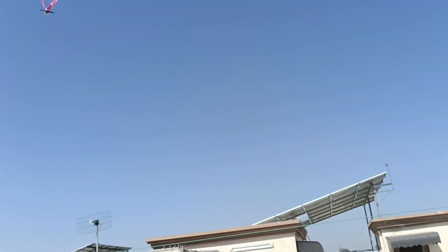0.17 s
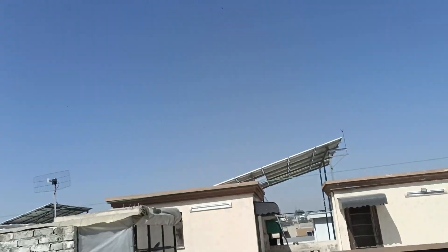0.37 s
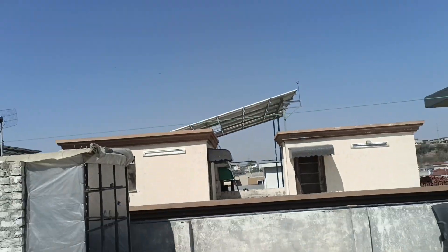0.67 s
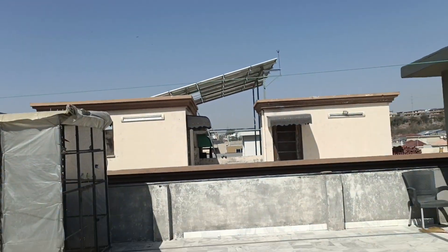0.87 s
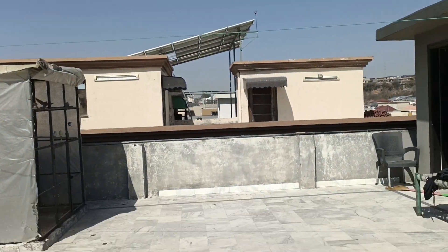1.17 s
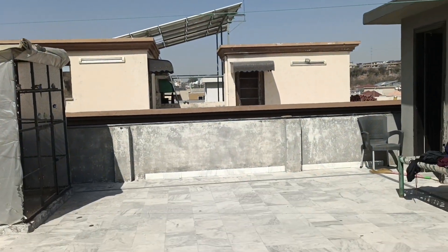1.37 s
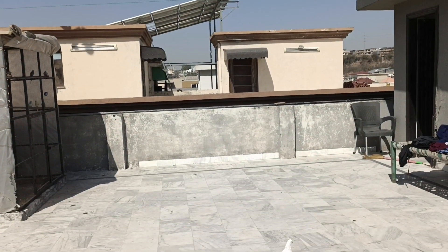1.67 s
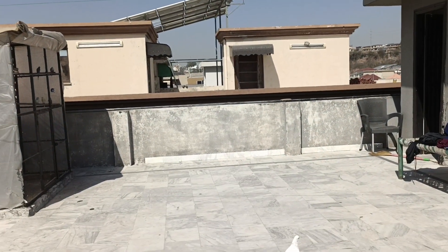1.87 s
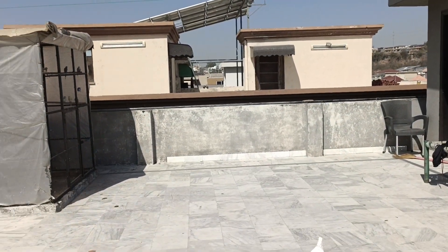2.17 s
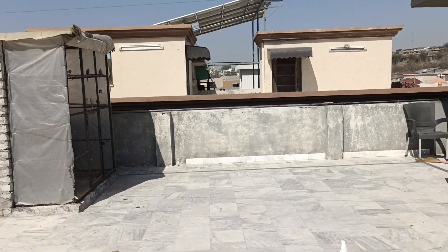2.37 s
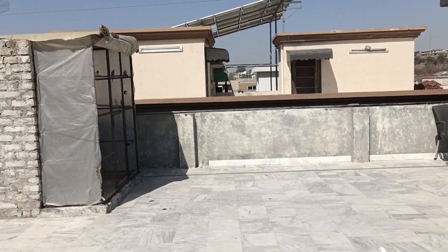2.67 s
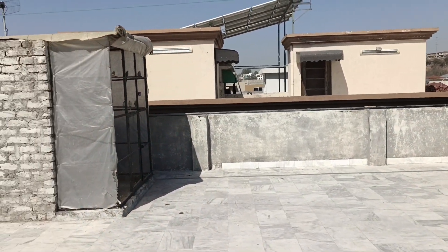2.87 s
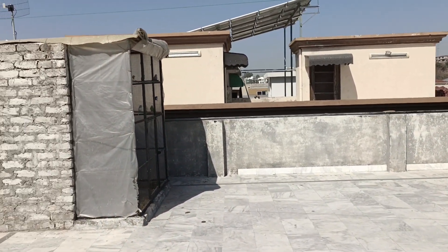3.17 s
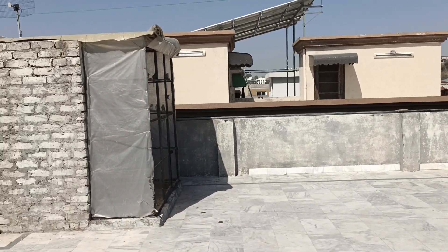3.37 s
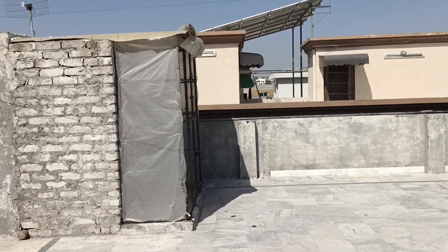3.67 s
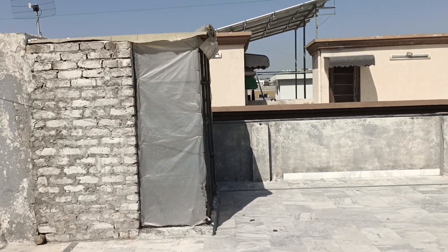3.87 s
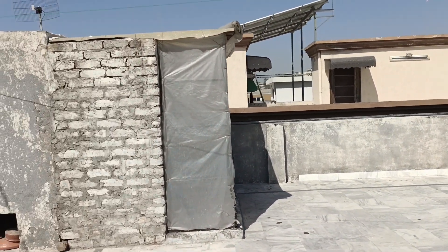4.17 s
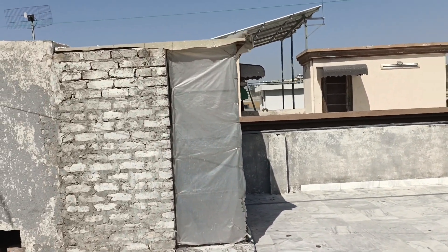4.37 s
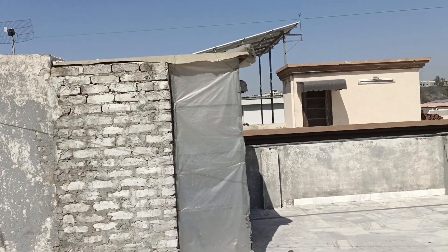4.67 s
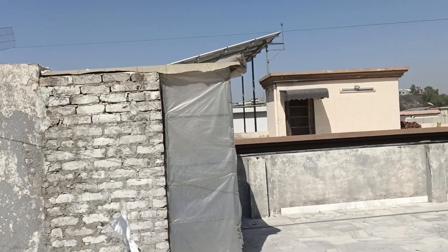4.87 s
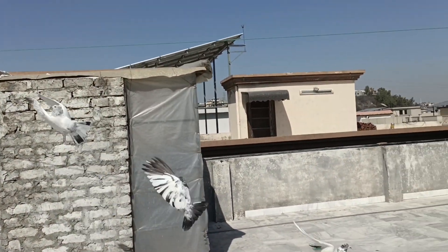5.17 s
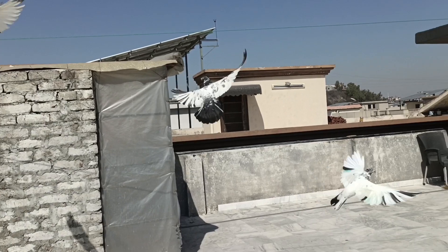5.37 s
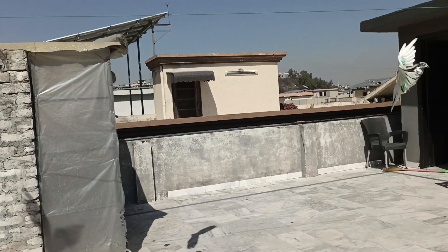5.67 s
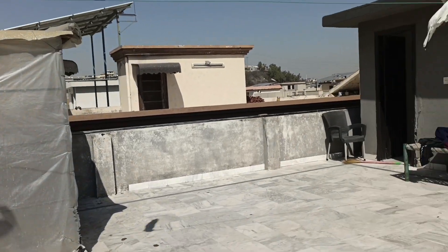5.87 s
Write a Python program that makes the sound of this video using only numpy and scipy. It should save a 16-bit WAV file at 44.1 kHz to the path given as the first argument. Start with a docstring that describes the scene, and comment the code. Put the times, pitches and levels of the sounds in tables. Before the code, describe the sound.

Crows caw repeatedly to the left as sharp pigeon wing claps and short myna chirps echo lightly off the walls of a rooftop. A soft knock leads into scratchy rustles, and a light wind rumbles on the microphone. Toward the end, pigeons fly up and pass close by, their wings slapping and swishing, with the town humming faintly behind.

```python
"""Sharp wing claps ring out as pigeons take off from a walled roof terrace: lone beats first, at the end
a close flurry of whooshing feathers. Each clap is an impact that rings the quills and the air between
the wings. Crows caw on the left, harmonics shaped by a narrow throat, and mynas chatter in whistled
glides; the walls echo them. Soft knocks and rough rustles of friction come in between, and a light
breeze buffets the microphones over the faint hum of the town."""
import sys
import numpy as np
from scipy import signal
from scipy.fft import rfft, irfft, next_fast_len
from scipy.io import wavfile
from scipy.ndimage import uniform_filter1d, map_coordinates

SR = 44100
rng = np.random.default_rng(int(sys.argv[2]) if len(sys.argv) > 2 else 0)


def wav_record(signal):
    """Record a signal, one row per channel, as 16-bit PCM in the file named by sys.argv[1]."""
    frames = np.transpose(np.atleast_2d(signal))
    bounded = np.clip(frames, -1, 1)
    # unit amplitude maps onto the largest positive 16-bit level
    quanta = np.round(bounded * 32767).astype(np.int16)
    wavfile.write(sys.argv[1], SR, quanta)


N = 264952
TIME = np.arange(N) / SR

# Table levels are relative. Pan is left level minus right level.
# Spectrum of air rushing through feathers: f/Hz, level/dB
SWISH_SPECTRUM = [(350, -13.5), (500, -26.5), (680, -6), (830, -11.5), (1150, -8), (1600, -2), (2300, -10),
                  (4000, -10.5), (5200, -25)]
# Spectrum of the fine hiss of sliding vanes or fibres: f/Hz, level/dB
HISS_SPECTRUM = [(2000, -3), (4000, 5), (5200, 0), (6500, 5), (7700, 9), (9200, 5), (12000, 2),
                 (15500, -1.5)]


def from_db(db):
    """Amplitude ratio of a level."""
    return 10 ** (np.asarray(db) / 20)


def rms_one(x):
    """Normalisation to unit rms."""
    return x / np.sqrt(np.mean(x ** 2) + 1e-20)


def envelope(points):
    """Gain interpolated through (t/s, level/dB) points, fading quickly outside their span."""
    s, db = np.transpose(points)
    inside = uniform_filter1d(((TIME >= s[0]) & (TIME <= s[-1] + .01)) * 1., size=400)
    return from_db(np.interp(TIME, s, db)) * inside


def swell_hold_release(s, swell_s, hold_s, release_s):
    """Envelope with a quadratic rise, a plateau and an exponential decay."""
    t = TIME - s
    return np.clip(t / swell_s, 0, 1) ** 2 * np.exp(-np.clip((t - swell_s - hold_s) / release_s, 0, 20))


def bump(s, half_s):
    """Gaussian envelope peaking at time s."""
    return np.exp(-np.minimum(((TIME - s) / half_s) ** 2, 20))


def at_hz(points, hz):
    """Gain interpolated through (f/Hz, level/dB) points, falling steeply beyond their ends."""
    f, db = np.transpose(points)
    log_f = np.log([f[0] / 2, *f, f[-1] * 2])
    return from_db(np.interp(np.log(hz + 1), log_f, [db[0] - 19.5, *db, db[-1] - 30]))


def colour(x, points):
    """Minimum-phase filter of unit power gain: causal, so nothing sounds early."""
    size = next_fast_len(x.shape[-1] + 4096)
    size += size % 2
    gain = rms_one(at_hz(points, np.arange(size // 2 + 1) * SR / size))
    cepstrum = irfft(np.log(gain))
    cepstrum[1:size // 2] *= 2
    cepstrum[size // 2 + 1:] = 0
    return irfft(rfft(x, size) * np.exp(rfft(cepstrum)), size)[..., :x.shape[-1]]


def passband(x, band, hz, order):
    """Maximally flat low-pass or high-pass filter."""
    return signal.sosfilt(signal.butter(order, hz, btype=band, fs=SR, output="sos"), x)


def resonator(x, hz, q):
    """Resonance with steep skirts, from two equal stages in cascade; unit rms."""
    b, a = signal.iirpeak(hz, max(q, 1), fs=SR)
    return rms_one(signal.lfilter(b, a, signal.lfilter(b, a, x + 1e-18)))


def drift(rate_hz, size=N):
    """Interpolated random fluctuation with a standard deviation near 1."""
    knots = rng.standard_normal(size // 8 + 4)
    return 1.2 * map_coordinates(knots, [np.arange(size) * min(rate_hz / SR, 1 / 8)], order=1)


def pan(db):
    """Constant-power panning; positive is to the left."""
    return rms_one(from_db(np.array([[db], [-db]]) / 2))


def noise_pair(correlation, size=N):
    """Partly correlated white noise at two microphones."""
    common = np.sqrt(correlation) * rng.standard_normal(size)
    return common + np.sqrt(1 - correlation) * rng.standard_normal((2, size))


def grainy(rate_hz, grain_db, correlation):
    """Friction noise: random modulation breaks it into tiny snaps, as of sliding vanes or fibres."""
    return rms_one(noise_pair(correlation) * from_db(grain_db * np.clip(drift(rate_hz), -2.5, 2.5)))


def patchy(x, depth_db, rate_hz):
    """Quarter-octave bands fluctuate independently, as hollows between moving surfaces change shape."""
    size = next_fast_len(N)
    spectrum, octave = rfft(x, size), np.log2(np.arange(size // 2 + 1) * SR / size + 1)
    out = 0
    for centre in np.arange(6, 12.6, .25):
        band = irfft(spectrum * np.clip(1 - 4 * np.abs(octave - centre), 0, 1), size)[:, :N]
        out = out + band * from_db(depth_db * np.clip(drift(rate_hz), -2, 2))
    return rms_one(out)


def add(out, s, sound):
    """Superpose a sound from time s onwards."""
    i = max(0, int(s * SR))
    out[:, i:i + sound.shape[-1]] += sound[:, :max(0, N - i)]


def terrace(x, wall_db, bass_t60_s=.45, treble_t60_s=.34, crossover_hz=3590):
    """Reverberation: smeared early reflections and a diffuse tail whose treble decays first."""
    # Wall reflections: delay/s, level/dB
    walls = [(0.0105, -2.5), (0.02, -3.5), (0.044, -6)]
    t, response = TIME[:SR * 3 // 4], 0
    for band, t60 in (("low", bass_t60_s), ("high", treble_t60_s)):
        shape = from_db(-4 - 60 * t / t60) * (t > .006)
        for delay, db in walls:
            shape = shape + from_db(db + wall_db) * np.exp(-np.abs(t - delay) / .00029)
        response = response + passband(noise_pair(.081, len(t)) * shape, band, crossover_hz, order=6)
    response = passband(response, "low", 6500, order=1)
    return signal.fftconvolve(x, rms_one(response) / np.sqrt(len(t)), axes=1)[:, :N]


def town_hum(floor_db=-72.5):
    """Steady ambient hum of the town; the recorder's automatic gain lifts it briefly in two lulls."""
    # Spectrum of the hum: f/Hz, level/dB
    spectrum = [(25, -16), (70, -1), (150, -0.5), (400, -6), (800, -10.5), (1500, -5.5), (2500, -15.5),
                (4200, -18.5), (5500, -35), (15000, -36.5)]
    # Lifts as the gain recovers, at set times: peak t/s, half-width/s, level/dB
    gain_lifts = [(1.486, 0.095, -72), (2.031, 0.12, -74)]
    strength = from_db(floor_db) + sum(from_db(db) * bump(s, half_s) for s, half_s, db in gain_lifts)
    return strength * colour(noise_pair(.73), spectrum)


def breeze(gain_db=3.5, lumpy_db=3):
    """Turbulence at the microphones: lumpy, low-frequency pressure fluctuations."""
    # The breeze gets up and stays: t/s, level/dB
    rise = [(2.2, -107), (2.4, -78), (3.3, -75.5), (4.6, -59.5), (6.0, -70.5)]
    # Gusts on top of it: peak t/s, half-width/s, level/dB
    gusts = [(2.424, 0.028, -71), (2.72, 0.034, -59.5), (3.019, 0.12, -74), (3.355, 0.061, -50.5),
             (3.447, 0.014, -41), (3.545, 0.08, -57), (3.9, 0.037, -57), (4.165, 0.062, -60),
             (4.411, 0.025, -51), (4.7, 0.055, -83), (5.076, 0.084, -63)]
    # Spectrum of the buffeting: f/Hz, level/dB
    spectrum = [(25, -43), (45, 6.5), (75, 12), (120, 5), (180, -8.5), (300, -21), (600, -96)]
    wind = envelope(rise) + sum(from_db(db) * bump(s, half_s) for s, half_s, db in gusts)
    buffet = rms_one(colour(noise_pair(.53), spectrum) * from_db(lumpy_db * drift(27)))
    return from_db(gain_db) * wind * buffet * pan(-15)


def rustles(release_s=.021, glide_width_hz=420):
    """Sliding friction drives resonances: a hollow note, a lumpy scuff, a gliding rasp and a hiss."""
    # Strokes: t/s, swell/s, hold/s, hollow f/Hz, hollow level/dB, scuff level/dB, rasp level/dB,
    # hiss level/dB, resonance f/Hz, its glide/(Hz/s), its level/dB
    strokes = [(2.118, 0.083, 0.026, 488, -97, -78, -60, -75, 4134, -5, -65),
               (3.332, 0.0084, 0.035, 408, -62, -44, -44.5, -67, 2170, 5000, -52),
               (3.351, 0.06, 0.055, 434, -51, -44, -41, -62, 3335, 4509, -42),
               (3.452, 0.041, 0.057, 567, -41.5, -38.5, -37.5, -53.5, 3214, 800, -45.5),
               (3.592, 0.021, 0.069, 659, -57, -47, -50, -67, 3970, 2, -61),
               (3.676, 0.064, 0.066, 590, -79, -82, -50.5, -71, 4350, -2000, -56.5),
               (3.991, 0.083, 0.098, 588, -93, -79, -39.5, -47.5, 3910, 3400, -44),
               (4.132, 0.061, 0.08, 456, -54.5, -45.5, -37.5, -45.5, 4730, -4000, -44),
               (4.291, 0.012, 0.023, 656, -70, -67, -39.5, -74, 2400, 0, -43)]
    # Spectrum of the scuff: f/Hz, level/dB
    scuff_spectrum = [(580, -11.5), (730, 5.5), (900, 13), (1020, 12), (1130, -11), (1280, -4), (1520, -12),
                      (1800, -2), (2300, -9), (2700, -9.5)]
    # Resonances of the rubbed surface: f/Hz, level/dB
    modes = [(930, -10), (1030, -3.5), (1260, -4.5), (1530, 4.5)]
    # Spectrum of the rasp: f/Hz, level/dB
    rasp_spectrum = [(1500, -7), (2000, -12), (2600, -7), (3300, -0.5), (3950, -3), (4600, -23),
                     (5400, -37.5)]
    lumps, friction = grainy(200, 2, .85), grainy(900, 1.5, .3)
    ringing = sum(from_db(db + 2 * drift(14)) * resonator(lumps, hz, q=11) for hz, db in modes)
    lumpy = rms_one(.82 * colour(lumps, scuff_spectrum) + ringing)
    coarse = patchy(colour(friction, rasp_spectrum), depth_db=4, rate_hz=12)
    fine = colour(friction, HISS_SPECTRUM)
    # complex narrowband noise, shifted up to the gliding resonance in each stroke
    narrow = passband(noise_pair(.57) + 1j * noise_pair(.19), "low", glide_width_hz / 2, order=4)
    narrow = rms_one(narrow.view(float)).view(complex)
    low, high = 0, 0
    for s, swell_s, hold_s, hollow_hz, *levels, ring_hz, glide_hz_per_s, ring_db in strokes:
        stroke, t = swell_hold_release(s, swell_s, hold_s, release_s), TIME - s
        hollow, scuff, rasp, hiss = np.outer(from_db(levels), stroke)
        glide = np.real(narrow * np.exp(2j * np.pi * (ring_hz + glide_hz_per_s * t / 2) * t))
        low = low + hollow * resonator(lumps, hollow_hz, q=3) + scuff * lumpy
        high = high + rasp * coarse + hiss * fine + from_db(ring_db) * stroke * glide
    return low * pan(2.94) + high * pan(8.5)


def knocks(attack_s=.0047):
    """Modal vibration of a struck hollow body; a long contact excites only the lowest modes."""
    # Soft blows: t/s, level/dB, contact time/s
    blows = [(3.332, -21, 0.00012), (3.502, -47, .0011)]
    # Modes of the body: f/Hz, level/dB, T60/s
    modes = [(144, -31, 0.29), (351.4, -10.5, 0.053), (372.4, 1.5, 0.046), (741, -14.5, 0.082),
             (1014, -22.5, 0.56), (1226, -4, 0.048), (1356, 15, 0.018), (2260, -1.5, 0.026),
             (2907, 4, 0.014)]
    out, t = np.zeros((2, N)), TIME[:SR // 5]
    for s, db, contact_s in blows:
        ring = 0
        for hz, mode_db, t60 in modes:
            amplitude = from_db(mode_db - 60 * t / t60) / (1 + (hz * contact_s) ** 4)
            ring = ring + amplitude * np.sin(2 * np.pi * (hz * t + rng.random()))
        add(out, s, from_db(db) * ring * (1 - np.exp(-t / attack_s)) * pan(4.8))
    return out


def caw_contours(scoop=.14, droop=.085, grit=.18, crack=.22):
    """Phonation follows the breath: a caw scoops up in pitch, then droops and cracks as air runs out."""
    # Caws: t/s, swell/s, hold/s, level/dB, fundamental f/Hz, hoarseness (0-1), overtone level/dB
    caws = [(0.0, 0.00035, 0.039, -42.5, 475.4, 0.29, 0), (0.368, 0.021, 0.16, -41, 465, 0.55, 8),
            (0.62, 0.065, 0.054, -53, 520, 0, 5), (1.035, 0.034, 0.15, -33, 467.5, 0, -0.5),
            (1.42, 0.068, 0.028, -54, 527, 0.35, 7.5), (1.53, 0.054, 0.11, -43, 480, 0.29, 2),
            (1.735, 0.017, 0.01994, -55, 470, 0.37, -3), (2.08, 0.15, 0.064, -43, 464.7, 0.44, 11),
            (2.34, 0.071, 0.16, -44.5, 480.7, 0.34, -3), (2.54, 0.057, 0.19, -54.5, 493.3, 0.33, -11),
            (2.79, 0.084, 0.17, -43, 475.8, 0.66, 6.5), (3.71, 0.069, 0.27, -48, 476, 0.39, 2)]
    loudness, hoarse, far = np.zeros((3, N))
    pitch, bright = np.full(N, float(caws[0][4])), np.ones(N)
    for s, swell_s, hold_s, db, hz, hoarseness, overtones_db in caws:
        begun = TIME >= s
        t = np.minimum(TIME[begun] - s, .5)
        progress, release_s = t / (swell_s + hold_s), .024 + .034 * hoarseness
        loudness += from_db(db) * swell_hold_release(s, swell_s, hold_s, release_s)
        pitch[begun] = hz * (1 - scoop * np.exp(-2 * t / swell_s) - droop * np.minimum(progress, 1.15) ** 2)
        hoarse[begun] = grit + hoarseness + crack * np.minimum(progress, 1.1) ** 6
        far[begun], bright[begun] = hoarseness, from_db(overtones_db)  # hoarser crows are further off
    # each caw takes over smoothly from the one before
    pitch, hoarse, far, bright = uniform_filter1d(np.array([pitch, hoarse, far, bright]), size=600)
    return loudness, pitch, np.clip(hoarse, 0, 1), far, bright


def crows(trill_hz=75, trill=.039, jitter=.051, flicker_db=4.5, blur_rad=.9, gain_db=-2):
    """Source and filter: harmonics of a fast-shaking pitch pass the formants of a narrow throat."""
    # Response of the throat: f/Hz, level/dB
    throat = [(900, -45), (1200, -22), (1370, -3.5), (1560, 7), (1780, 3), (1980, 10.5), (2250, -31),
              (2700, -64), (3250, -39.5), (3600, -45.5), (4130, -19), (4400, -33.5), (4650, -37.5),
              (5150, -63.5), (5600, -35), (6100, -45.5), (6400, -53), (8000, -45.5), (10000, -56.5)]
    loudness, pitch, hoarse, far, bright = caw_contours()
    shake = np.sin(2 * np.pi * np.cumsum(trill_hz * (1 + .21 * hoarse * drift(40))) / SR)
    phase = 2 * np.pi * np.cumsum(pitch) / SR
    wobble = 2 * np.pi * np.cumsum(pitch * (trill * shake + jitter * hoarse * drift(500))) / SR
    voice = sum(at_hz(throat, k * pitch) * np.sin(k * (phase + wobble)) for k in range(2, 6))
    for k in range(6, 20):  # faint overtones waver independently and throb with the shake
        strength = at_hz(throat, k * pitch) * from_db(flicker_db * (drift(22.21) - .5))
        overtone = np.sin(k * phase + (1.5 + 3 * hoarse) * wobble + blur_rad * drift(260))
        voice += bright * (1 + .23 * shake) * strength * overtone
    voice /= np.sqrt(uniform_filter1d(voice ** 2, size=1800))  # even out the power
    rattle = from_db(4 * hoarse * drift(150))
    voice = passband(voice * rattle, "high", 1200, order=8) * from_db(gain_db) * loudness
    direct, wet = 1 - .46 * far, from_db(-19) + from_db(-1) * far
    return voice * direct * pan(16) + terrace(voice * wet * pan(13), wall_db=5.5)


def mynas(warble_hz=70, warble=.039, rasp=.09, buzz_hz=620, beak_hz=4900, overtone_db=-33, gain_db=3):
    """Modulated whistles: in harsh notes a second voice adds sidebands; pitch and strength break up."""
    # Notes: t/s, nominal length/s, start f/Hz, end f/Hz, level/dB, harshness (0-1)
    notes = [(0.481, 0.0075, 2990, 2970, -41.5, 0.04), (0.499, 0.022, 3430, 2800, -37, 0.21),
             (0.515, 0.0042, 4650, 4520, -52, 0.05), (0.516, 0.016, 4000, 3830, -37, 0.45),
             (0.541, 0.019, 2880, 3210, -33.5, 0.09), (0.565, 0.012, 3210, 2966, -35, 0.23),
             (0.573, 0.036, 4060, 3910, -40.5, 0.77), (2.274, 0.02, 4100, 3850, -50, 0.2),
             (2.312, 0.036, 3400, 1990, -47.5, 0.92), (2.356, 0.026, 3270, 2428, -50, 0.3),
             (2.395, 0.019, 2560, 2520, -42, 0.71), (2.527, 0.005, 4550, 4320, -43, 0),
             (2.543, 0.021, 4400, 3010, -42, 0), (2.585, 0.021, 3090, 1870, -47.5, 0.53),
             (2.624, 0.018, 3000, 2640, -44, 0.24), (2.645, 0.026, 3234, 2504, -37, 0.44),
             (2.669, 0.035, 4180, 3000, -36.5, 0.73), (2.704, 0.048, 3051, 2992, -35.5, 0.09),
             (2.743, 0.02, 3800, 3280, -37, 0.93), (3.275, 0.058, 3800, 3725, -59, 0.09),
             (3.399, 0.018, 3720, 3624, -42.5, 0.27), (3.757, 0.01, 3780, 3490, -44.5, 0.16),
             (3.803, 0.06, 2200, 3194, -53.5, 0.48), (3.844, 0.044, 3205, 2674, -45.5, 0.74),
             (3.899, 0.041, 3120, 2854, -47, 0.93), (4, 0.046, 2314, 3100, -50, 0.95),
             (4.143, 0.018, 3300, 3030, -39, 0.15), (4.163, 0.031, 2100, 1933, -44, 0.74),
             (4.169, 0.041, 4110, 3053, -37.5, 0.94), (4.206, 0.033, 3030, 2876, -36, 0),
             (4.242, 0.035, 3690, 3057, -37, 0.87), (4.336, 0.028, 3200, 2906, -40.5, 0.73),
             (4.403, 0.028, 3970, 3550, -40.5, 0.21), (4.456, 0.046, 3785, 3055, -42, 0.8),
             (5.043, 0.055, 4007, 2880, -45.5, 0.62), (5.108, 0.054, 3217, 2450, -45.5, 0.2),
             (5.177, 0.034, 3067, 3487, -35, 1), (5.218, 0.038, 3017, 2986, -33, 0.1),
             (5.257, 0.064, 3560, 3480, -46.5, 0.8), (5.291, 0.0096, 3020, 3050, -39.5, 0.7),
             (5.806, 0.016, 2562, 2704, -45, 0.28), (5.833, 0.028, 2566, 1975, -47.5, 1)]
    out = np.zeros((2, N))
    for s, length_s, start_hz, end_hz, db, harsh in notes:
        u = np.linspace(0, 1, int((length_s + .00625) * SR))
        jitter, flicker = drift(1500, 8000)[:len(u)], drift(301, 8000)[:len(u)]
        sway = warble * np.sqrt(abs(harsh)) * np.sin(2 * np.pi * (warble_hz * u * length_s + rng.random()))
        pitch = np.interp(u, [0, 1], [start_hz, end_hz]) * (1 + sway + rasp * harsh * jitter)
        phase = 2 * np.pi * np.cumsum(pitch) / SR
        second_voice = 1 + harsh * np.sin(2 * np.pi * np.cumsum(buzz_hz * (1 + .15 * flicker)) / SR)
        voice = passband(np.sin(phase) * second_voice, "low", beak_hz, order=8)
        voice += from_db(overtone_db) * (np.sin(2 * phase) + .35 * np.sin(3 * phase))
        shape = signal.windows.tukey(len(u), .4) * from_db((4.1 * harsh - 1) * flicker)
        add(out, s - .002, from_db(db + gain_db) * rms_one(voice * shape) * pan(7 * harsh))
    return out


def wingbeats(birds=3, beat_hz=9.7, depth=.48):
    """Incoherent addition: the stroke powers of birds beating out of step sum to one envelope."""
    cycles = [rng.random() + np.cumsum(beat_hz * (1 + .1745 * drift(1.9))) / SR for _ in range(birds)]
    strokes = rms_one(np.sqrt(sum(np.sin(np.pi * cycle) ** 10 for cycle in cycles)))
    return rms_one(1 - depth + depth * strokes)


def flock(swish_db=2.5, vane_db=-12, thrum_db=-3):
    """Aerodynamic noise: beating wings whoosh, ruffle their vanes and shake the air."""
    # Swish of the flock, louder when closer: t/s, level/dB
    nearness = [(4.3, -53), (4.6, -46.5), (4.72, -46.5), (4.775, -50.5), (4.87, -47.5), (5.03, -41.5),
                (5.075, -50), (5.13, -41.5), (5.29, -43.5), (5.47, -53.5), (5.57, -45), (5.61, -53.5),
                (5.71, -49.5), (6.0, -49.5)]
    # Low flutter of air as the birds pass close: t/s, level/dB
    flutter = [(4.9, -52.5), (5.188, -46.5), (5.472, -63.5), (5.5, -54.5), (5.65, -70), (5.726, -50.5),
               (6.0, -50)]
    # Spectrum of that flutter: f/Hz, level/dB
    flutter_spectrum = [(80, -14), (108, 6), (130, -4.5), (160, -3), (210, -11.5)]
    beating = envelope(nearness) * wingbeats()
    whoosh = from_db(swish_db) * patchy(colour(grainy(110, 2.5, .7), SWISH_SPECTRUM), 5, 26)
    vanes = from_db(vane_db) * colour(grainy(350, 2, .3), HISS_SPECTRUM)
    thrum = from_db(thrum_db) * envelope(flutter) * colour(noise_pair(1), flutter_spectrum)
    return beating * (whoosh * pan(6.1) + vanes * pan(2.7)) + thrum * pan(-.41)


def flaps(hollow_q=5.8, crinkle_db=-11):
    """Cavity resonance: a close stroke squeezes a hollow puff from under the wing; feathers crinkle."""
    # Close wing strokes: peak t/s, half-width/s, level/dB, hollow f/Hz
    strokes = [(4.088, 0.03, -51.5, 780), (4.345, 0.012, -52, 780), (4.408, 0.011, -49, 310),
               (4.463, 0.025, -47.5, 840), (4.498, 0.013, -36.5, 318), (4.58, 0.013, -49, 805),
               (4.614, 0.023, -53, 329), (4.685, 0.0074, -50, 1290), (4.708, 0.028, -51.5, 326),
               (4.715, 0.014, -41, 1300), (4.746, 0.015, -63, 1040), (4.811, 0.011, -49.5, 296),
               (4.913, 0.051, -51, 1030), (5.003, 0.0056, -48, 1122), (5.019, 0.044, -47, 321),
               (5.023, 0.0098, -49, 1013), (5.08, 0.063, -55, 774), (5.65, .012, -50, 1460),
               (5.784, 0.0079, -51, 845), (5.9, 0.0079, -45.5, 804)]
    puff, crinkle = grainy(250, 2.5, .9), colour(grainy(400, 4, .5), SWISH_SPECTRUM)
    out = 0
    for s, half_s, db, hollow_hz in strokes:
        stroke = from_db(db) * bump(s, half_s)
        hollow = np.sqrt(np.mean(stroke ** 2)) * resonator(puff * stroke, hollow_hz, hollow_q)
        out = out + hollow + from_db(crinkle_db) * stroke * crinkle
    return out


def quill_ticks(swell_s=.0024, decay_s=.00081):
    """Broadband transients: one stiff quill flicks past another with a tiny bright snap."""
    # Flicks: t/s, level/dB
    flicks = [(3.149, -48), (3.225, -52.5), (4.04, -37), (4.67, -46), (4.787, -28), (5.359, -51),
              (5.398, -43)]
    shape = sum(from_db(db) * swell_hold_release(s, swell_s, 0, decay_s) for s, db in flicks)
    return shape * colour(noise_pair(1), HISS_SPECTRUM) * pan(3)


def wing_claps(snap_delay_s=.001, soft_slap_s=.006, ring_width_hz=300, crackle_db=2.5, gain_db=.56):
    """Impact excitation: the wings meet in two quick slaps, ringing the quills and the hollow between."""
    # Claps: t/s, level/dB, slap decay/s, gap to second slap/s, its level/dB, nearness (0-1), pan/dB,
    # quill f/Hz, quill level/dB, hollow f/Hz, hollow level/dB
    claps = [(0.0103, -42.5, 0.004, 0.0092, 9.5, 0.3, 7, 2420, 3.5, 1790, -21),
             (0.2033, -41.5, 0.0057, 0.0069, 0, 0, 5, 1630, -2, 1176, -6),
             (0.39, -37, 0.0038, 0.0074, 4, 0.26, 3.5, 3200, -7, 1416, 1.5),
             (0.5652, -36.5, 0.0057, 0.0077, -4, 0.2, 3, 3180, 4, 1390, -5),
             (0.739, -39, 0.0031, 0.0077, 1, 0.17, 5, 3130, -2, 2500, -2),
             (0.8085, -37.5, 0.0023, 0.0063, -10, 0.32, 7, 3180, -2.5, 2370, -2),
             (0.9297, -39.5, 0.0031, 0.0054, -5, 0.24, 6, 4220, 3.5, 1610, 0),
             (1.0964, -53, 0.011, 0.0035, -12, 0, 7, 6070, -4, 1800, -8),
             (2.406, -52, 0.0069, 0.011, -21, 0.44, -4, 4080, 0, 1850, -10),
             (3.0787, -45.5, 0.005, 0.0073, -12, 0.44, -2.5, 2930, -5, 1393, 2),
             (3.1059, -40.5, 0.004, 0.0087, -6, 0.35, 7, 3720, 2, 2250, -2),
             (4.648, -49.5, 0.0036, 0.008, -17, 0.72, -2, 3340, -2, 1290, 9),
             (4.788, -36.5, 0.0009, 0.0045, 2, 0.65, 2, 3870, -0.5, 1006, -10),
             (4.8202, -39, 0.0057, 0.0096, -13, 0.4, 1, 3280, -9, 1030, -6),
             (4.8563, -38, 0.0055, 0.012, -13, 0.87, -0.5, 2230, -2, 1160, 1.5),
             (4.884, -44, 0.0027, 0.0064, -14, 0.6, -6, 3220, -8, 740, 1.5),
             (4.9592, -33, 0.0037, 0.006, -18, 0.91, -1, 3200, -8, 1010, 0.5),
             (5.1116, -41, 0.005, 0.0086, -13, 0.92, -4, 2700, 2, 930, 4.5),
             (5.1631, -24, 0.0065, 0.0086, -14, 0.92, 0, 3040, 1, 854, -7),
             (5.272, -35, 0.007, 0.008, -16, 0.67, -4.5, 3500, 0, 810, -2),
             (5.5012, -35, 0.004, 0.0074, -0.5, 0.8, 1, 2060, 3, 1840, -1.5),
             (5.5265, -32, 0.017, 0.011, -11, 0.66, -3.5, 1630, -6, 1230, -6.5),
             (5.623, -45, 0.015, 0.0076, -15, 0.7, 0.5, 1500, 0, 970, 4),
             (5.6921, -30, 0.0026, 0.0066, -2.5, 0.79, -3.5, 1630, -6, 783, -10),
             (5.7149, -41, 0.0074, 0.008, -8, 0.8, 10, 2310, 1, 1560, -3),
             (5.7453, -41.5, 0.004, 0.012, -15, 0.87, 4, 1940, 4, 960, -12),
             (5.809, -40, 0.0043, 0.0075, -9, 0.81, -3, 2700, -2, 610, -10),
             (5.8662, -39.5, 0.005, 0.01, -19, 0.82, -2, 1790, -8, 1080, 0.5),
             (5.921, -35, 0.003, 0.014, -7, 0.79, -1, 1650, -6, 1000, -9)]
    # Spectrum of the low body of a clap: f/Hz, level/dB
    body = [(120, -25.5), (300, -16), (520, -21.5), (800, 0.5), (1100, -8.5), (1500, -0.5)]
    # Spectrum of its mid-range crack: f/Hz, level/dB
    crack = [(1050, -31.5), (1500, 16.5), (1800, 0.5), (2300, 11), (2900, 7.5), (4300, 12.5), (5300, -6.5),
             (7000, -28.5)]
    # Spectrum of its treble fizz: f/Hz, level/dB
    fizz = [(4000, -27), (5500, 2), (7600, 4.5), (9200, -0.5), (12000, -6), (15500, -10)]
    size = 4000
    out, t = np.zeros((2, N)), TIME[:size]
    attack = 1 - np.exp(-t / .00025)
    brush = from_db(-18) * np.exp(-t / .018)  # the feathers brush apart
    for s, db, slap_s, gap_s, second_db, near, pan_db, ring_hz, ring_db, hollow_hz, hollow_db in claps:
        second_slap = from_db(second_db) * (t > gap_s) * np.exp(-np.abs(t - gap_s) / slap_s)
        crackle = from_db(crackle_db * drift(1100, size))
        shape = attack * (np.exp(-t / slap_s) + second_slap + brush) * crackle
        snaps = np.zeros(size)
        snaps[np.searchsorted(t, [snap_delay_s, snap_delay_s + gap_s])] = 1, from_db(second_db)
        snaps = from_db(-3) * np.exp(-slap_s / soft_slap_s) * rms_one(snaps)  # long slaps lose the snap
        # a near clap has more body and less fizz
        bands = [(body, -33.5 + 39 * near, .85), (crack, -1.5, .4), (fizz, .5 - 9.5 * near, .25)]
        clap = 0
        for spectrum, band_db, correlation in bands:
            impact = snaps + rms_one(noise_pair(correlation, size) * shape)
            clap = clap + from_db(band_db) * rms_one(colour(impact, spectrum))
        quills = resonator(noise_pair(.1, size) * shape, ring_hz, q=ring_hz / (2 * ring_width_hz))
        hollow = resonator(noise_pair(.2, size) * shape, hollow_hz, q=8)
        clap += from_db(ring_db) * quills + from_db(hollow_db) * hollow
        add(out, s, .24 * from_db(db + gain_db) * clap * pan(pan_db))
    return out


def scene(impact_wet_db=-12, myna_wet_db=-4):
    """Superposition of the direct sounds and their echoes between the walls."""
    impacts, chatter = wing_claps() + quill_ticks() + knocks(), mynas()
    echoes = terrace(from_db(impact_wet_db) * impacts, wall_db=15.5)
    echoes += terrace(from_db(myna_wet_db) * chatter, wall_db=10.5)
    return impacts + chatter + echoes + crows() + flock() + flaps() + rustles() + breeze() + town_hum()


def record(dry, lag_s=.000379, split_hz=1125, cutoff_hz=16100):
    """Time difference between spaced microphones: the left lags in the treble; the top is cut steeply."""
    size = next_fast_len(N + 2000)
    hz = np.arange(size // 2 + 1) * SR / size
    delay_s = lag_s * (1 - 1 / (1 + (hz / split_hz) ** 6))
    left = irfft(rfft(dry[0], size) * np.exp(-2j * np.pi * hz * delay_s), size)[:N]
    top_cut = signal.ellip(10, .1, 70, cutoff_hz, fs=SR, output="sos")
    return signal.sosfilt(top_cut, np.array([left, dry[1]]))


dry = scene()
out = record(dry)
wav_record(out)
```